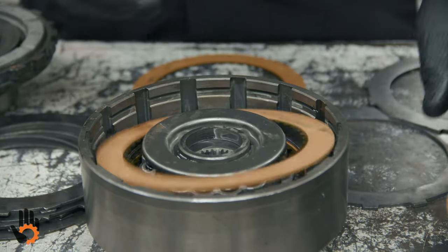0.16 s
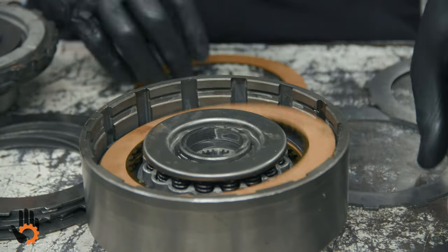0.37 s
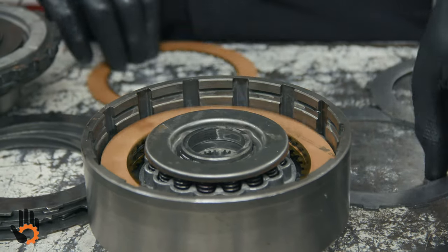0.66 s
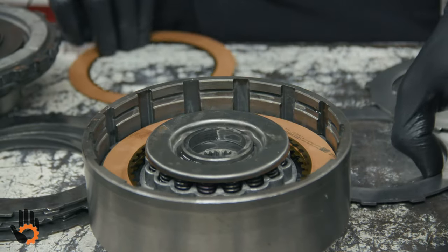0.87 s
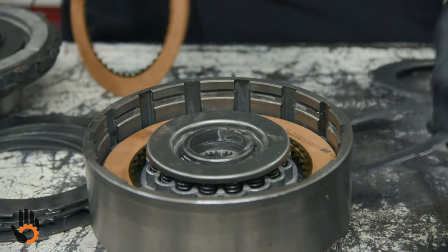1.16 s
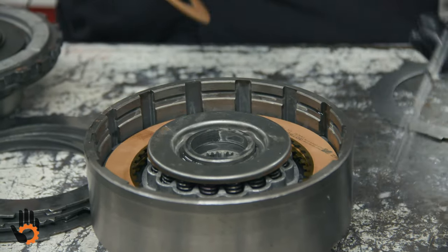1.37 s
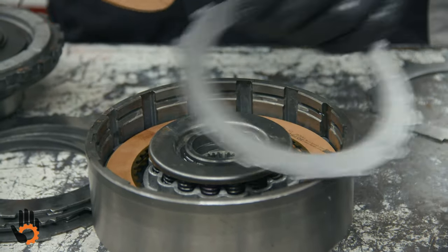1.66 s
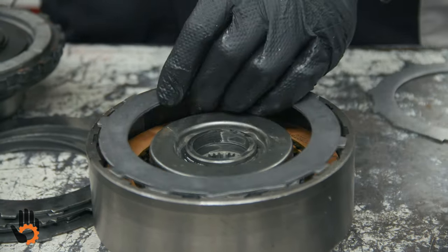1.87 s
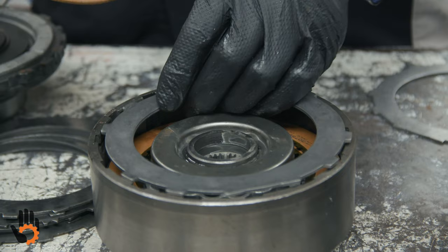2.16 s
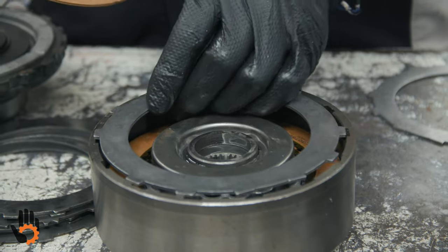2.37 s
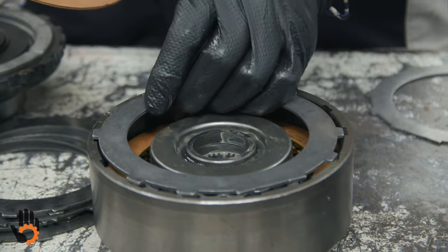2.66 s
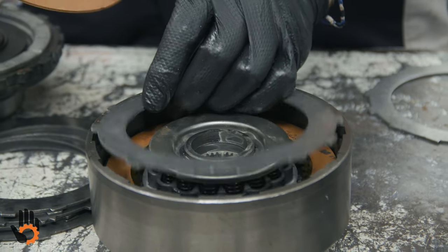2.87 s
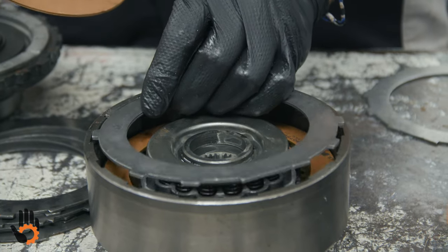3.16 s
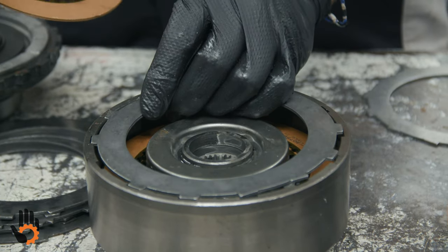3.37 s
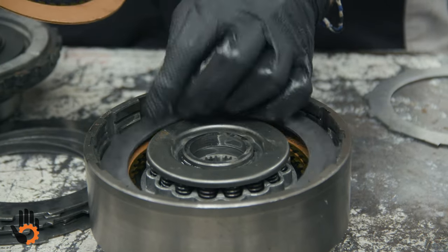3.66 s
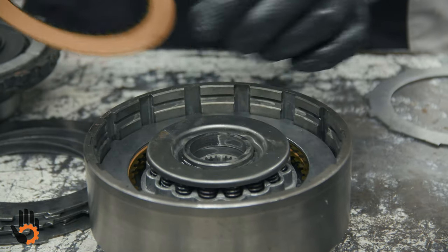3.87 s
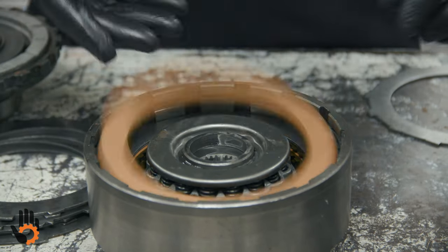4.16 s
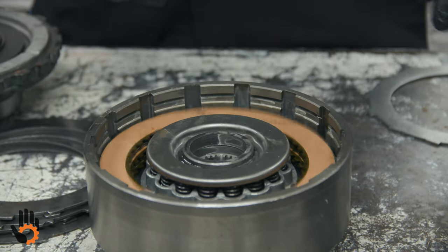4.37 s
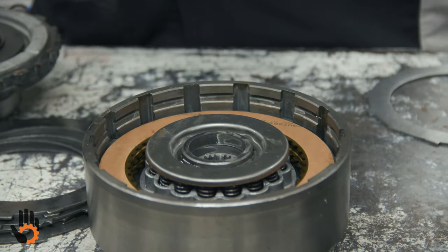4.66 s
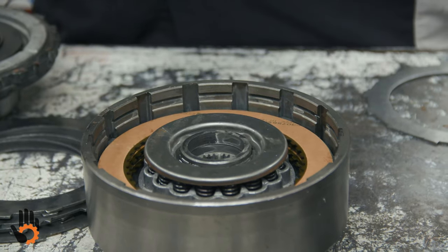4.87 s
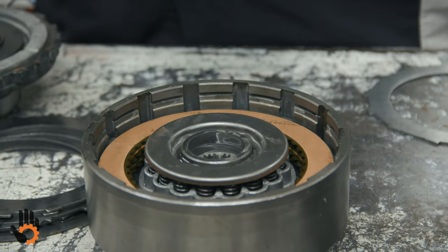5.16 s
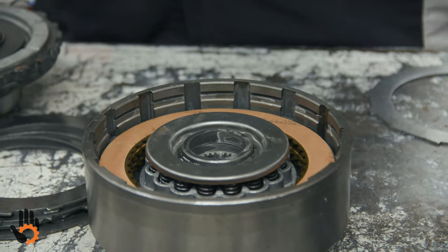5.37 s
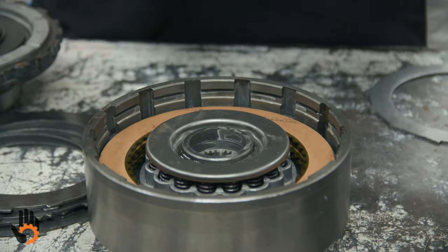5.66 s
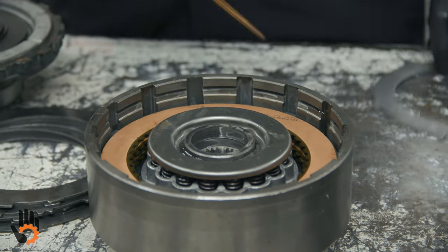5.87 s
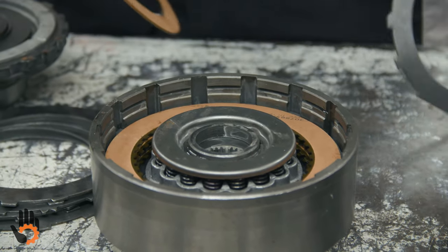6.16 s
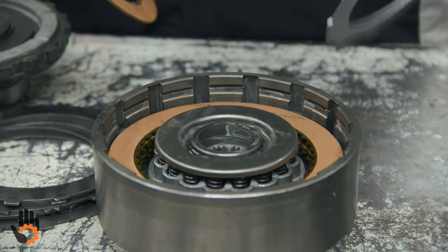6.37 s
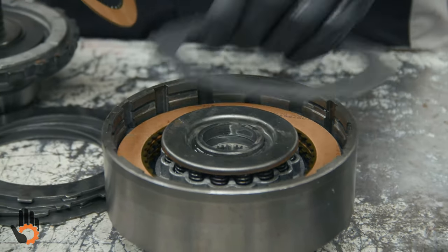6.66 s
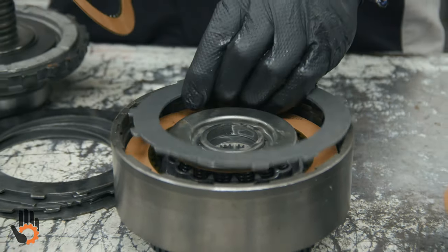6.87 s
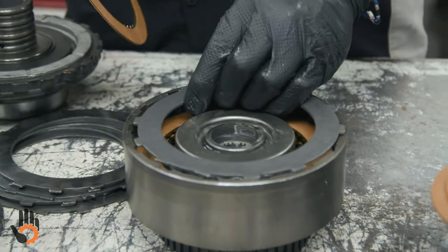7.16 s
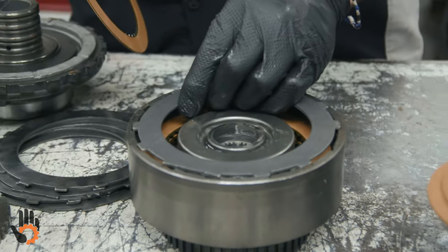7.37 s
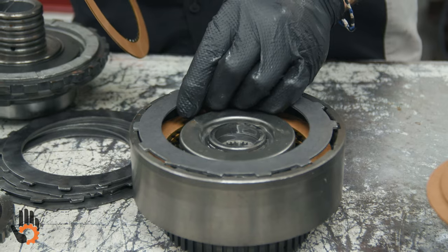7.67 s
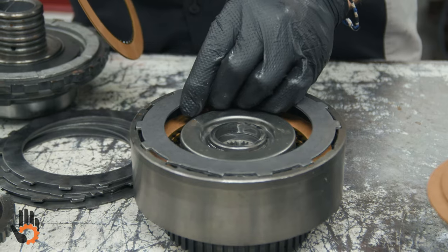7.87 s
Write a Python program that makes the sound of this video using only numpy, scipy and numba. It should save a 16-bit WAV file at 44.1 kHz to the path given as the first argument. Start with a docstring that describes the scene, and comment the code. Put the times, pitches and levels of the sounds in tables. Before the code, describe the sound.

A close, dry perspective on a bench in a quiet workshop, with steady low hum, faint hiss and a short echo. From 0.1 to 0.35 s a lined ring rattles brightly into a steel drum; a dull bench knock comes near 0.5, then light contacts and a thin, flickering high hiss until about 0.9. At 1.0-1.4 a bare steel ring drags harshly, ending in a strong clank. It knocks the rim at 1.6-1.95, then tiny irregular clinks continue to 3.45. It drops with a short rattle at 3.6-3.95. Another lined ring clatters in at 4.27-4.5, with light taps afterwards. Lively metallic contacts and short rubs run from 5.25 to 5.8. Steel scrapes and knocks the bench at 5.9-6.3; a pause, then a firm rim clank at 6.9-7.05. Delicate fidgeting clinks and faint rubbing finish around 8.

```python
"""Clutch rings are stacked in a steel drum on a workbench. Lined rings drop in and rattle, one with a thin hiss;
from 1 s bare steel rings are dragged, knocked on the rim and let fall, then tapped and fidgeted with. Lined rings
follow from 4.3 s, steel from 5.9 s, light clinks last. Blows and rubbing drive decaying modes and coloured noise
in ring, drum and bench; an echo follows, and a quiet workshop hums and hisses throughout."""
import sys
import numpy as np
from scipy import signal
from scipy.fft import rfft, irfft, next_fast_len
from scipy.io import wavfile
from scipy.ndimage import uniform_filter1d, map_coordinates
from numba import njit

SR = 44100
rng = np.random.default_rng(int(sys.argv[2]) if len(sys.argv) > 2 else 0)


def digitize_waveform(pressure):
    """Quantize a signal to 16-bit integers and store it at the path in sys.argv[1].

    Rows of a 2-D input are taken as channels; values are limited to [-1, 1].
    """
    field = np.atleast_2d(pressure).T
    bounded = np.clip(field, -1, 1)
    quanta = np.round(bounded * 32767).astype(np.int16)
    wavfile.write(sys.argv[1], SR, quanta)


N = 354123


def amp(db):
    """Gain of a level in dB."""
    return 10 ** (np.asarray(db) / 20)


def along(points, hz):
    """Value at hz between (f/Hz, value) points, on a log frequency axis."""
    f, v = np.transpose(points)
    return np.interp(np.log(hz + 1), np.log(f + 1), v)


def filtered(x, response):
    """x with its spectrum multiplied by a function of frequency."""
    m = next_fast_len(N + 8192)
    spectrum = rfft(x, m) * response(np.fft.rfftfreq(m, 1 / SR))
    return irfft(spectrum, m)[..., :N]


def noise(colour):
    """Random noise shaped by a colour table and set to rms 1."""
    x = filtered(rng.standard_normal(N), lambda hz: amp(along(colour, hz)))
    return x / x.std()


def wobble(rate):
    """A smooth random curve through rate knots a second."""
    knots = rng.standard_normal(int(N * rate / SR) + 4)
    return map_coordinates(knots, [np.arange(N) * rate / SR])


# Contacts [t/s, ring blow level/dB, drum blow level/dB, chatter t60/s]; levels are relative
LINED_CONTACTS = [(0.1167, -12, -21.5, 0.18), (0.14, -28, -23, 0.063), (0.1863, -4, -25, 0.029),
                  (0.2125, -9.5, -27, 0.052), (0.2435, -5, -16.5, 0.067), (0.2876, -4, -22, 0.013),
                  (0.3129, 3, -67, 0.076), (0.3328, -7, -18.5, 0.19), (0.4509, -11, -16, 0.017),
                  (0.557, -25, -16, 0.074), (0.6872, -5, -25, 0.086), (4.2737, 5, -24.5, 0.044),
                  (4.2835, -12, -29, 0.052), (4.2965, -1, -26, 0.097), (4.3326, -3.5, -31.5, 0.32),
                  (4.3951, -6, -23.5, 0.19), (4.528, -22, -31, 0.036), (4.9788, -24, -24, 0.026),
                  (5.2919, -13, -21, 0.063), (5.3083, 1.5, -11, 0.17), (5.3421, -2.5, -44, 0.2),
                  (5.4195, 0, -19.5, 0.14), (5.456, -21.5, -23, 0.25), (5.524, -14, -22, 0.11),
                  (5.6151, -11, -18, 0.037), (5.6915, -19, -33, 0.19), (5.8116, -23, -25, 0.063)]
STEEL_CONTACTS = [(1.1198, -18, -52, 0.031), (1.3598, 4, -2, 0.12), (1.6346, -6, -18, 0.087),
                  (1.6586, -10.5, -13, 0.14), (1.7867, -7, -26, 0.058), (1.9156, -5, -22, 0.071),
                  (1.9438, -8, -22, 0.3), (2.2968, -25, -25.5, 0.13), (2.3613, -25, -45.5, 0.026),
                  (2.5171, -12.5, -25, 0.044), (2.5582, -14.5, -25, 0.092), (3.1714, -22, -25.5, 0.014),
                  (3.3727, -26.5, -27.5, 0.098), (3.6299, -25.5, -35.5, 0.63), (3.66, -23, -29.5, 0.13),
                  (3.683, -8, -25.5, 0.28), (3.7162, -13, -19.5, 0.13), (3.8071, -18, -34, 0.02),
                  (3.84, -16, -13, 0.055), (3.93, -16, -18, 0.031), (6.0035, -14.5, -21.5, 0.12),
                  (6.0274, -8.5, -34, 0.197), (6.192, -9.5, -19, 0.071), (6.262, -16.5, -43, 0.086),
                  (6.8833, -14.5, -6, 0.065), (6.9087, -1.5, -30, 0.34), (7.0238, -6, -17.5, 0.19),
                  (7.4725, -28, -27, 0.037), (7.701, -29, -29, 0.021)]
# Slides of either kind of ring [start t/s, length/s, ring level/dB, drum level/dB, bench level/dB]; relative
LINED_SLIDES = [(0.37, 0.13, -40, -38.5, -50), (0.57, 0.3, -34, -39.5, -37.5),
                (4.4, 0.096, -64, -36.5, -46.5), (5.06, 0.13, -39.5, -59, -77),
                (5.255, 0.022, -69, -48.5, -43), (5.62, 0.017, -44, -53, -37.5),
                (5.7, 0.11, -38.5, -47.5, -51)]
STEEL_SLIDES = [(1.025, 0.08, -45.5, -49, -41.5), (1.12, 0.069, -38.5, -36.5, -27.5),
                (1.212, 0.1, -21.5, -27.5, -23.5), (1.36, 0.069, -18, -16, -16),
                (2.2, 0.33, -59.5, -55, -54.5), (3.05, 0.059, -64, -59.5, -53.5),
                (3.75, 0.21, -83, -45, -42.5), (5.935, 0.011, -47, -68, -37),
                (5.978, 0.12, -36, -54, -34.5), (6.13, 0.099, -49.5, -31, -29.5),
                (6.4, 0.023, -56.5, -65, -106), (7.34, 0.13, -64.5, -63, -53)]


def stacking():
    """Contacts and slides of both kinds of ring excite the rings, the drum and the bench together."""
    lined = held(LINED_CONTACTS)
    steel = held(STEEL_CONTACTS + taps() + fidgets())
    both = np.vstack([lined, steel])
    lined_rub, steel_rub = rubbing(LINED_SLIDES), rubbing(STEEL_SLIDES)
    rub = lined_rub + steel_rub
    rings = lined_rings(lined, lined_rub[0]) + steel_rings(steel, steel_rub[0])
    return rings + drum(both, rub[1]) + bench(both, rub[2]) + whistle() + ticks()


RING, SHELL = 0, 1  # which level and freedom columns of a contact drive a body: ring or drum

# Colour of the rings' unpitched noise [f/Hz, relative level/dB]
RING_GRIT = [(2500, 11.5), (4000, 8), (6000, -2), (9500, 13), (13000, 6.5), (15000, 0.5), (16000, -27.5)]
# Modes of a lined ring [f/Hz, relative level/dB, undamped t60/s]
LINED_MODES = [(4606, -8, .1), (6438, -2, .2), (7208, -10, .12), (8382, -10, .1), (9179, -4, .08),
               (11590, -2, .2), (12450, -7, .1), (13820, -9, .1), (14530, -10, .07)]


def lined_rings(contacts, rub):
    """Lined rings: gritty noise over modes from 4.6 kHz up."""
    return body(crowded(LINED_MODES, minor_db=-12), RING_GRIT, contacts, rub, RING,
                blow_gain_db=-26, shake_db=-26, sing_db=-13, crack_db=-7.0, chatter_db=-19.5, rub_db=-12.5)


# Modes of a bare steel ring [f/Hz, relative level/dB]
STEEL_MODES = [(1730, -7), (4020, -10), (5260, -13), (7190, -5), (7800, -9), (8050, -10), (8580, -3),
               (9140, -2), (10290, -4), (10450, -7), (11350, 0), (12210, -5), (13540, -6), (14150, -7)]
STEEL_T60_S = .14  # undamped decay, the same for every mode in the table


def steel_rings(contacts, rub):
    """Bare steel rings: more strongly ringing modes with the same grit."""
    table = [(hz, db, STEEL_T60_S) for hz, db in STEEL_MODES]
    return body(crowded(table, minor_db=-11), RING_GRIT, contacts, rub, RING,
                blow_gain_db=-14, shake_db=-20, sing_db=0, crack_db=-3.5, chatter_db=-20.0, rub_db=-2.0)


# Modes of the drum [f/Hz, relative level/dB, undamped t60/s]
DRUM_MODES = [(940, -11, .1), (1180, 1, .15), (1560, -10, .08), (1988, 0, .14), (2410, -1, .12),
              (3180, -11, .1)]
# Colour of the drum's unpitched clack [f/Hz, relative level/dB]
DRUM_CLACK = [(500, -6), (1000, 14), (2500, 6), (4500, -3.5), (9000, -19.5)]
SOFT_DULL = .14  # dB an octave that a drum blow loses for each dB below a hard one


def drum(contacts, rub):
    """The steel drum answers every contact; softer blows excite its upper modes less."""
    return body(crowded(DRUM_MODES, minor_db=-15), DRUM_CLACK, contacts, rub, SHELL,
                blow_gain_db=-3, shake_db=-6, sing_db=-7, crack_db=-6, chatter_db=-15, rub_db=-5,
                soft_dull=SOFT_DULL)


# Light taps of a hand-held ring on the drum's rim [t/s, drum blow level/dB, chatter t60/s]
RIM_TAPS = [(2.0942, -26, .032), (2.1333, -33.5, 0.05), (2.806, -52, .03), (2.8348, -37.5, 0.031),
            (3.0536, -38, 0.077), (3.759, -21.5, 0.043), (3.903, -19, 0.02), (4.559, -26.5, .02),
            (4.619, -37, 0.046), (4.886, -22, .02), (4.93, -25, 0.038), (5.877, -31, .031),
            (7.2307, -39.5, .13), (7.3423, -45, 0.13), (7.404, -45, 0.071), (7.438, -41, .03),
            (7.92, -34, 0.15), (8.009, -34, 0.082)]
TAP_RING_DB = -8  # blow on the held ring relative to the blow on the drum


def taps():
    """Rim taps as steel contacts, weaker on the held ring than on the drum."""
    return [(s, db + TAP_RING_DB, db, t60) for s, db, t60 in RIM_TAPS]


# Spells when fingers feel for the slots with a steel ring [start t/s, end t/s]
FIDGET_SPELLS = [(2.1, 3.45), (7.15, 8.03)]
FIDGET_RATE, FIDGET_FLOOR_DB = 22, -47  # clinks a second, weakest blow on the ring


def fidgets():
    """Chance clinks of the held ring, as steel contacts."""
    rows = []
    for start, end in FIDGET_SPELLS:
        draw = rng.uniform(size=(int(FIDGET_RATE * (end - start)), 2))
        times = start + (end - start) * draw[:, 0]
        ring_db = FIDGET_FLOOR_DB - 4 * np.log(draw[:, 1])  # a few stand out
        rows += [(s, db, db - 8, .03) for s, db in zip(times, ring_db)]
    return rows


# How freely ring and drum sound on: high when a ring falls loose, low when fingers or bench damp them
# [t/s, ring level/dB, drum level/dB]
FREEDOM_CURVE = [(0.1, -8, 7), (0.26, 7.5, -2), (0.4, -22, -22), (1.25, -2.5, -25), (1.4, -6, -23),
                 (1.65, -20, -33), (1.78, -2.5, -7.5), (2.1, -8, -17.5), (2.8, -24.5, -26),
                 (3.599, -3.5, -5), (3.82, -3.5, -2.5), (3.85, -33.5, -36), (4.269, -2.5, 9), (4.4, 7, -6),
                 (4.55, -19, -16), (5.701, -8.5, -26), (6.0, -11.5, -18.5), (6.95, -4, -14),
                 (7.25, -1, -0.5), (7.7, -13.5, -15), (8.0, -10, -7)]


def handling():
    """Freedom of ring and drum in dB at every sample."""
    s, *columns = np.transpose(FREEDOM_CURVE)
    return [np.interp(np.arange(N) / SR, s, c) for c in columns]


def held(contacts):
    """The contacts, each with the freedom of ring and drum at its moment added as columns."""
    contacts = np.array(contacts)
    at = np.round(contacts[:, 0] * SR).astype(int)
    return np.column_stack([contacts, np.transpose(handling())[at]])


RISE_S, FADE_T60_S = 0.003, 0.41  # every slide


def rubbing(slides):
    """Gains per sample for ring, drum and bench: each slide rises, holds and fades."""
    t, gains = np.arange(N) / SR, np.zeros((3, N))
    for start, length, *db in slides:
        rise = np.clip((t - start) / RISE_S, 0, 1)
        fade = amp(-60 * np.clip(t - start - length, 0, 2) / FADE_T60_S)
        gains += amp(db)[:, None] * rise * fade
    return gains


def grain(depth_db):
    """Sliding surfaces catch and let go: a fast and a slower random gain."""
    return amp(depth_db * wobble(220) + 3.5 * wobble(55))


HARD_DB = -12  # blows below this count as soft


def body(table, colour, contacts, rub, part, blow_gain_db, shake_db, sing_db, crack_db, chatter_db, rub_db,
         soft_dull=0):
    """One steel object: blows, the chatter after them and sliding drive its modes and make unpitched noise."""
    times, blow_db, free_db = contacts[:, 0], contacts[:, 1 + part], contacts[:, 4 + part]
    chatter_s = np.clip(contacts[:, 3], .02, 1)
    t = np.arange(SR // 2) / SR
    chatter, shake, crack = np.zeros((3, N + SR))
    for i, db, t60, free in zip(np.round(times * SR).astype(int), blow_db, chatter_s, free_db):
        # a loose ring keeps bouncing, ever smaller
        bounces = amp(db - 60 * t / t60) * (1 - np.exp(-t / 0.0035))
        chatter[i:i + len(t)] += amp(chatter_db) * bounces
        shake[i:i + len(t)] += amp(shake_db + free) * bounces
        crack[i:i + len(t)] += amp(db + crack_db - 60 * t / 0.012) * (1 - np.exp(-t / 0.0016))
    rough = grain(depth_db=1.5)
    hiss = (crack[:N] + rough * (chatter[:N] + amp(rub_db) * rub)) * noise(colour)
    freedom = handling()[part]
    strokes = rough * (shake[:N] + amp(sing_db + freedom) * rub)
    dull = soft_dull * np.minimum(blow_db - HARD_DB, 0)
    return hiss + modes(table, strokes, times, blow_db + blow_gain_db + free_db, np.minimum(freedom, 0), dull)


def crowded(table, minor_db, count=16):
    """The strong modes plus a crowd of weak, short ones spread between them."""
    low, high = table[0][0], table[-1][0]
    place = (np.arange(count) + rng.uniform(size=count)) / count
    return table + [(low * (high / low) ** p, minor_db, .04) for p in place]


CHOKE = .35  # dB of faster decay for each dB of lost freedom


def modes(table, strokes, times, blow_db, free_db=0, dull=0):
    """Resonators driven by tiny impacts under strokes and by single blows."""
    at, out = np.round(times * SR).astype(int), np.zeros(N)
    spots = rng.standard_normal((len(at), len(table)))  # each blow lands on another spot
    impacts = strokes * rng.standard_normal(N)
    choke = amp(-CHOKE * free_db) * np.ones(N)
    for k, (hz, db, t60) in enumerate(table):
        loss = np.log(1000) / (t60 * SR)
        # the contact wanders over the nodes, feeding and choking the ring
        wander = amp(2.2 * wobble(35))
        drive = wander * impacts * np.sqrt(2 * loss)
        tilt_db = dull * np.log2(hz / table[0][0])
        spot_db = (2 - .3 * db) * spots[:, k]  # weak modes vary most with the spot
        drive[at] += (-1) ** k * amp(blow_db + tilt_db + spot_db)
        out += amp(db) * wander * ring(drive, loss, choke, 2 * np.pi * hz / SR)
    return out


@njit
def ring(drive, loss, choke, w):
    """One two-pole resonator whose loss per sample follows the choke."""
    out = np.zeros(len(drive))
    for n in range(2, len(drive)):
        r = 1 - loss * choke[n]
        out[n] = 2 * r * np.cos(w) * out[n - 1] - r * r * out[n - 2] + np.sin(w) * drive[n - 1]
    return out


# Thin hiss of a sliding lined ring [t/s, level/dB]
WHISTLE_CURVE = [(0.56, -46), (0.768, -44), (0.9, -53)]


def whistle():
    """A thin high hiss, flickering in level, while a lined ring slides off its neighbour."""
    s, db = np.transpose(WHISTLE_CURVE)
    level_db = np.interp(np.arange(N) / SR, s, db, left=-120, right=-120)
    # narrow band around 12 kHz
    band = noise([(11000, -47.0), (12100, 3), (12450, -8.0), (12800, -17.5), (14000, -52.5)])
    return amp(level_db + 3.5 * wobble(43)) * band


# Edge ticks [t/s, level/dB]
EDGE_TICKS = [(3.88, -23.5), (4.09, -48), (4.106, -46.5), (4.153, -49), (6.2443, -18.5)]


def ticks():
    """Tiny dry edge ticks: treble noise with an instant start and a 9.6 ms t60."""
    t, gate = np.arange(SR // 50) / SR, np.zeros(N)
    for s, db in EDGE_TICKS:
        gate[round(s * SR):][:len(t)] = amp(db - 60 * t / 0.0096)
    return gate * noise([(5000, -37.5), (9500, 8), (15000, -35.0)])


# Knocks of hands and stacks on the bench [t/s, legs level/dB, top level/dB]
BENCH_KNOCKS = [(0.522, -19, -32.5), (3.894, -29, -38.5), (3.929, -23.5, -54), (5.934, -19.5, -29),
                (6.128, -38, -28), (6.194, -46, -14.5)]
# Modes of the bench top, then of its legs [f/Hz, relative level/dB, t60/s]
TOP_MODES = [(232, -5, .1), (335, -11, .07), (450, -6, .1), (590, 1, .08), (690, 0, .07), (790, -6, .06),
             (1055, -7, .1)]
LEG_MODES = [(102, 0, .2), (172, -3, .12)]
# Colour of dragging on the bench top [f/Hz, relative level/dB]
DRAG_COLOUR = [(60, -6), (200, 2.5), (650, 1), (1300, -17.5), (3000, -54)]
JOLT_LOSS_DB = 13  # from a drum blow to its jolt on the bench, before the trims of legs, top and air


def bench(contacts, rub):
    """The top hums under a dragged ring; jolts knock it, boom in the legs and push the air."""
    times, jolt_db = contacts[:, 0], contacts[:, 2] - JOLT_LOSS_DB
    jolts = np.column_stack([times, jolt_db - 0.5, jolt_db - 12])
    knock_times, legs_db, top_db = np.vstack([BENCH_KNOCKS, jolts]).T
    rub = rub * grain(depth_db=2.5)
    drag = amp(-6) * rub * noise(DRAG_COLOUR)
    top = modes(TOP_MODES, amp(-7) * rub, knock_times, top_db)
    push = modes([(52.7, 0, 0.12)], 0, times, jolt_db + 1.0)
    legs = modes(LEG_MODES, amp(-19.5) * rub, knock_times, legs_db)
    return drag + top + push + legs


# Decay of the room's answer [f/Hz, t60/s]
ROOM_DECAY = [(200, .4), (2000, .27), (12000, .03)]


def walls(x):
    """The room's answer: a noise tail after 300 samples, each frequency dying at its own speed."""
    hz, t, z = signal.stft(rng.standard_normal(SR // 2), SR, nperseg=256)
    decay = amp(-60 * t / along(ROOM_DECAY, hz)[:, None])
    tail = signal.istft(z * decay, SR, nperseg=256)[1]
    return signal.fftconvolve(np.pad(x, (300, 0)), tail / np.linalg.norm(tail))[:N]


# Colour of the workshop's hum and hiss [f/Hz, relative level/dB]
SHOP_COLOUR = [(20, -15), (70, -0.5), (130, 6), (230, -4.5), (400, -7), (1100, -19), (3000, -27),
               (5000, -42), (6100, -30.5), (7100, -52.5), (8300, -28.5), (11000, -28), (14000, -35.5),
               (16000, -37)]
SHOP_DB = -49  # mean level


def shop():
    """Quiet workshop hum and hiss: coloured noise, very slightly unsteady in level."""
    return amp(SHOP_DB + 0.08 * wobble(2.6)) * noise(SHOP_COLOUR)


def scene():
    """Bench work, its echo and the shop noise."""
    work = stacking()
    return (work + amp(-11.5) * walls(work) + shop())[None]


TOP_HZ, BASS_HZ = 15900, 38  # band limit, -6 dB point of the bass roll-off


def record(dry):
    """A gain control eases the loudest clatter; the deepest bass and all above the band limit are dropped."""
    power = np.abs(uniform_filter1d(dry ** 2, SR // 100, origin=SR // 400))  # 10 ms mean, mostly of the past
    eased = dry * (1 + power / amp(-19.0) ** 2) ** -.3
    return filtered(eased, lambda hz: (hz < TOP_HZ) * hz ** 4 / (hz ** 4 + BASS_HZ ** 4))


dry = scene()
out = record(dry)
digitize_waveform(out)
```